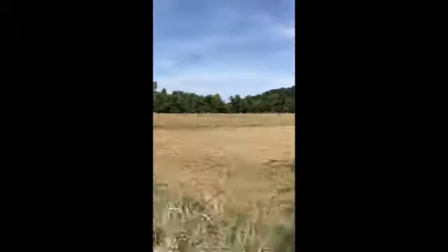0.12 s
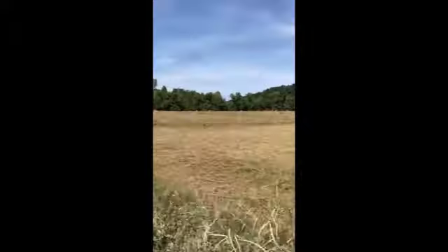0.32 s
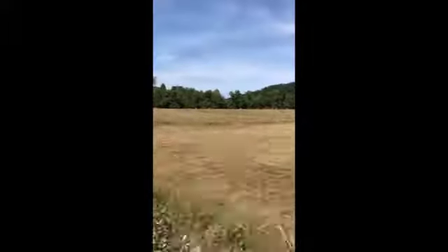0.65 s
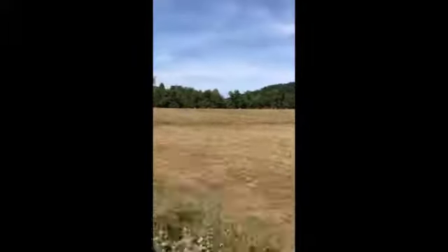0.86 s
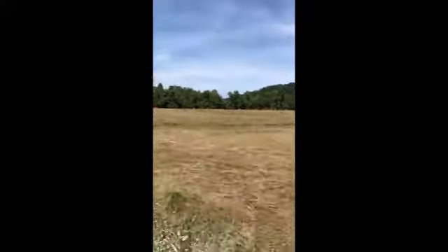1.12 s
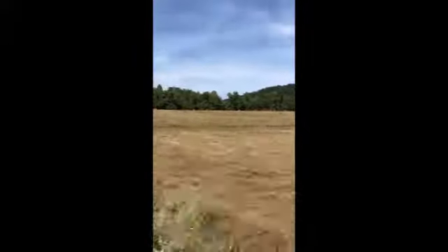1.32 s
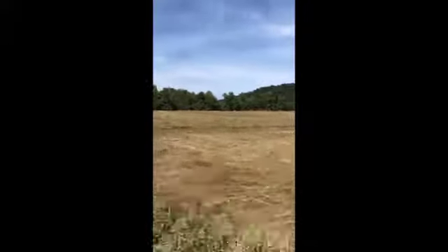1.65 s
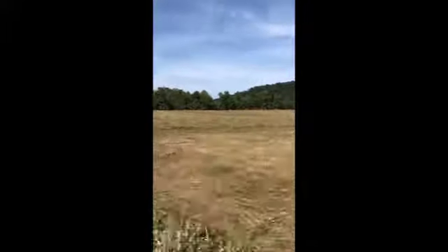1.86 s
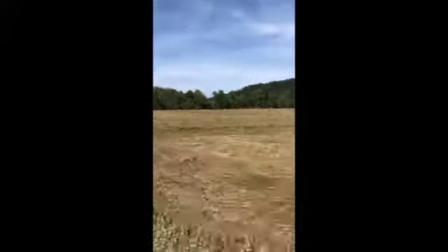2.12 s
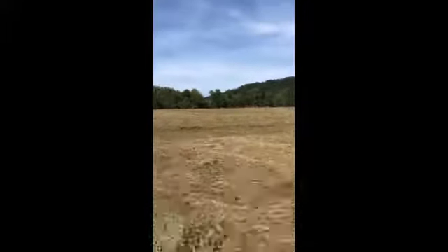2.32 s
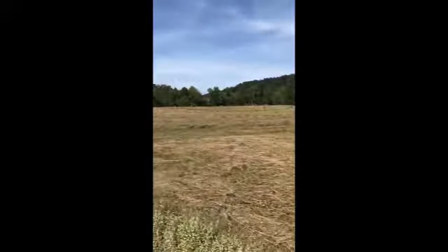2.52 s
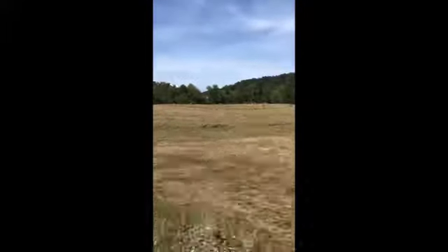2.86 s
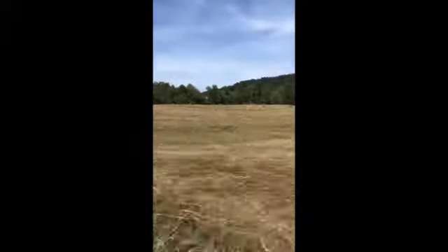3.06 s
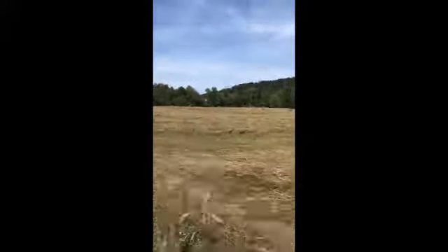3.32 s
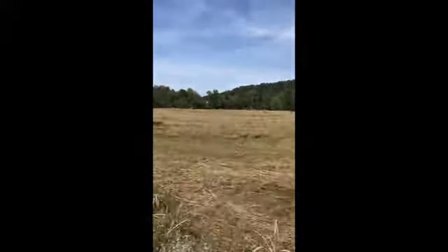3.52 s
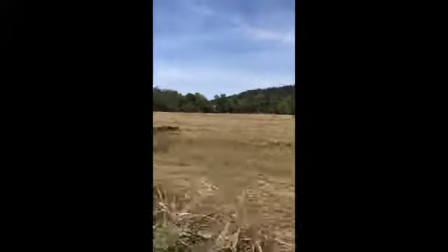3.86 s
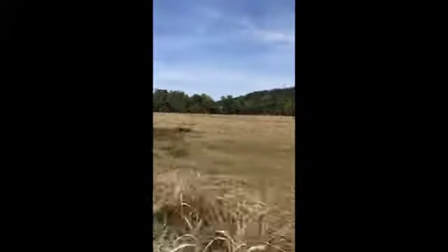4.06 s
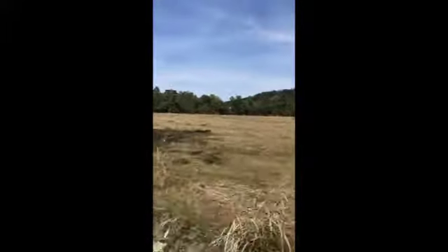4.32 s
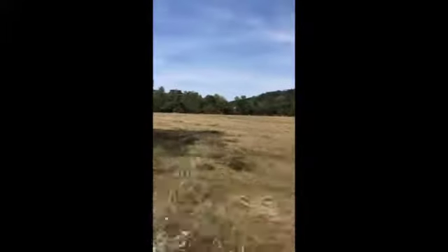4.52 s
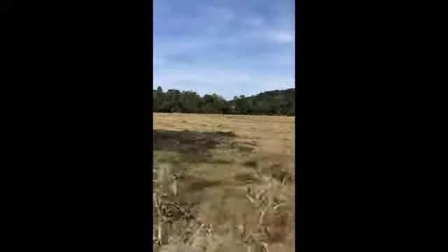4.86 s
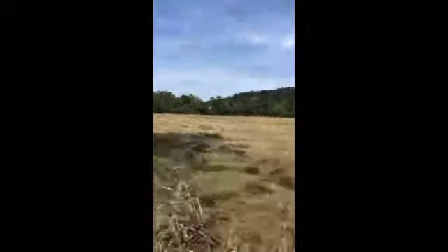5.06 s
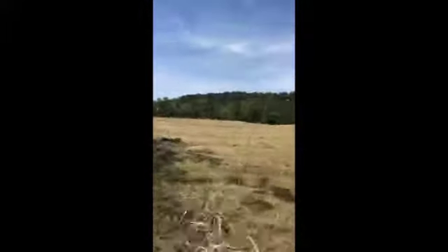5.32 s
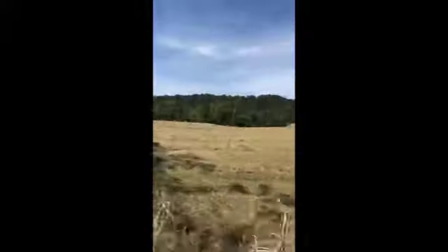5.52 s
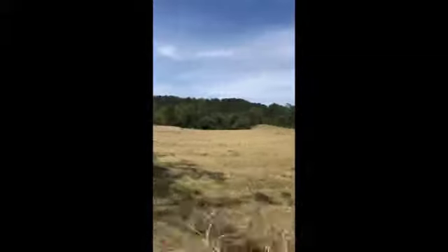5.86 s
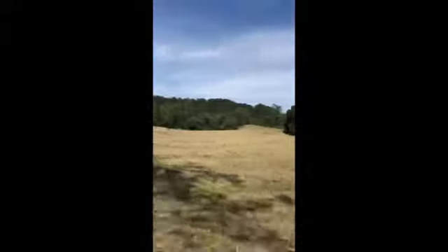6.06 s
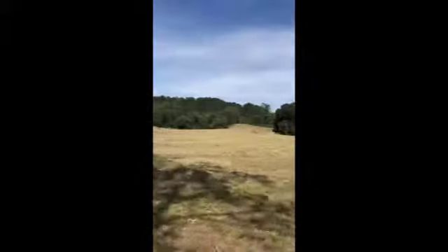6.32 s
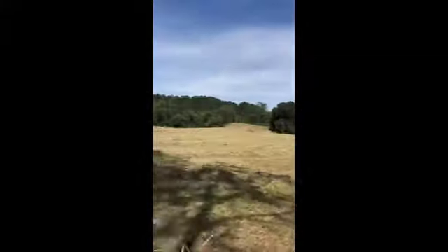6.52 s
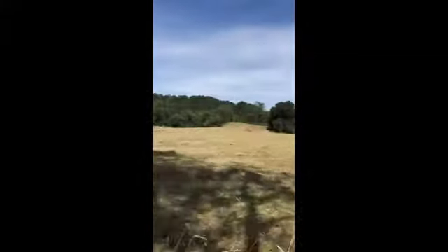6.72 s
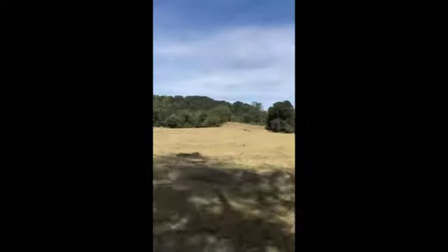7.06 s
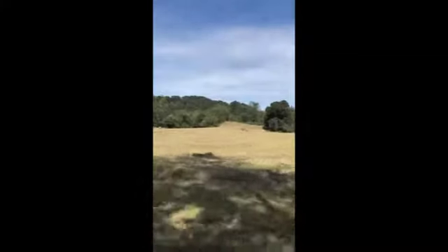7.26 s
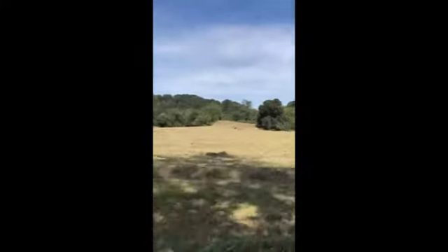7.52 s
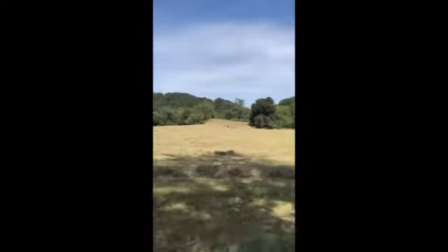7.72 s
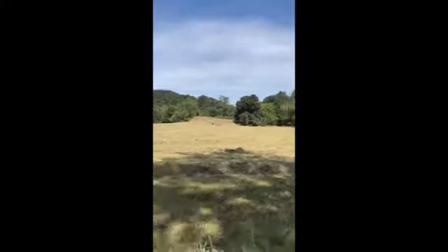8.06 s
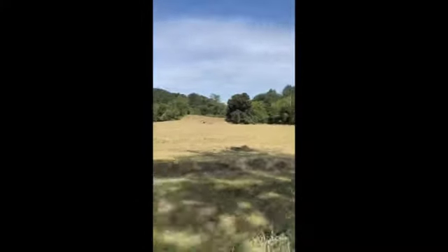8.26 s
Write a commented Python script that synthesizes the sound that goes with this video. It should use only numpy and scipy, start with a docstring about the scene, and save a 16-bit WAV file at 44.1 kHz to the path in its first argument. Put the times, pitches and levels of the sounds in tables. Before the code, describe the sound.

Outdoors in an open field, a microphone on a moving cart takes steady uneven rolling noise, knocks and loose body chatter. Dry stalks tick and snap, mostly in the first half. Short wind puffs hit separately with brief lulls, thicken past five seconds, and become dense mid-low roaring and flapping that nearly buries the cart until the end. Faint shrill insects sit on top.

```python
"""Tyre rumble and thumps of wind open the ride of a golf cart over a dry, bumpy field, heard from the seat.
Shaped noise and grains make the rumble, sine partials the drive hum, decaying panel modes the body rattle.
Stalks crackle and snap as filtered grains and bursts; insects buzz high in the grass as narrow noise.
Eddies of wind hit the microphone as short pressure swings, then crowd into a howling gust
that drives the limiter."""
import sys
import numpy as np
from scipy import signal
from scipy.fft import rfft, irfft, next_fast_len
from scipy.io import wavfile
from scipy.ndimage import uniform_filter1d, minimum_filter1d, map_coordinates

SR = 44100
rng = np.random.default_rng(int(sys.argv[2]) if len(sys.argv) > 2 else 0)


def to_wav(s):
    """Save 16-bit WAV."""
    ch = np.atleast_2d(s).T  # columns
    pcm = np.round(np.clip(ch, -1, 1) * 32767)  # PCM
    wavfile.write(sys.argv[1], SR, pcm.astype(np.int16))


N = 369999  # length in samples


def amp(db):
    """Decibels to gain."""
    return 10 ** (np.asarray(db) / 20)


def unit(x):
    """Scale to rms 1."""
    return x / np.sqrt(np.mean(x ** 2) + 1e-20)


def curves(rows):
    """One value per sample for each column after the time."""
    times, *columns = np.transpose(rows)
    return [np.interp(np.arange(N) / SR, times, column) for column in columns]


def wobble(rate):
    """A smooth random curve, rate knots a second."""
    knots = rng.standard_normal(4096)
    return map_coordinates(knots, [np.arange(N) * rate / SR], mode="wrap")


def filtered(x, response):
    """x times a response of frequency."""
    size = next_fast_len(N + SR // 2)
    spectrum = rfft(x, size) * response(np.fft.rfftfreq(size, 1 / SR))
    return irfft(spectrum, size)[:N]


def coloured(x, points):
    """x filtered by the (Hz, dB) points, joined along log frequency, at rms 1."""
    f, db = np.transpose(points)
    return unit(filtered(x, lambda hz: amp(np.interp(np.log(hz + 1), np.log(f), db))))


def noise(points):
    """Coloured noise of rms 1."""
    return coloured(rng.standard_normal(N), points)


def patchy(x, depth_db):
    """x with its colour shifting in small random patches of pitch and time, at rms 1."""
    bins = signal.stft(x, nperseg=1024)[2]
    field = uniform_filter1d(rng.standard_normal(bins.shape), size=4, axis=0)
    field = uniform_filter1d(field, size=6, axis=1)
    return unit(signal.istft(bins * amp(depth_db * unit(field)), nperseg=1024)[1][:N])


def narrow(hz, width_hz):
    """A narrow band of noise of rms 1 whose centre follows hz."""
    def slow_noise():
        return filtered(rng.standard_normal(N), lambda f: (1 + (f / width_hz) ** 2) ** -.9)
    phase = 2 * np.pi * np.cumsum(hz) / SR
    return unit(slow_noise() * np.cos(phase) + slow_noise() * np.sin(phase))


def grains(rate, spread_db, life):
    """Tiny noise bursts of uneven size at random moments, rate a second, dying with time constant life."""
    sizes = amp(spread_db * np.clip(rng.standard_normal(N), -2, 2))
    kicks = (rng.random(N) < rate / SR) * sizes
    envelope = signal.lfilter([1], [1, -np.exp(-1 / (life * SR))], kicks)
    return envelope * rng.standard_normal(N)


def add(track, s, sound):
    """Mix a sound into the track at s seconds."""
    part = track[max(round(s * SR), 0):][:len(sound)]
    part += sound[:len(part)]


def low_cut(x, hz):
    """Shed the bass below hz."""
    return signal.sosfilt(signal.butter(2, hz, "highpass", fs=SR, output="sos"), x)


# The ride over the ground. Each row: time in seconds, rolling noise in dB.
ROLL_LEVEL = [(0, -23.5), (1.5, -27), (1.9, -24.5), (2.9, -27), (3.12, -28), (3.4, -26.5), (3.8, -25.5),
              (3.97, -28), (4.15, -27), (4.7, -24.5), (5.9, -24.5), (6.6, -29), (8.39, -26.5)]
# Colour of the rolling noise. Each row: frequency in Hz, level in dB per Hz.
ROLL_SPECTRUM = [(20, -5), (35, -2), (52, -27), (75, -9), (105, 1), (180, 6), (290, -3.5), (480, -1.5),
                 (720, -3.5), (950, -9.5), (1130, -7), (1450, -13.5), (2400, -21), (3300, -29),
                 (6000, -37.5), (10000, -41), (16000, -79)]
# The drive at a nearly steady speed. Each row: time in seconds, hum pitch in Hz, level in dB.
DRIVE_CURVE = [(0, 109, -51), (1.1, 106.5, -35), (2.2, 108.2, -33), (3, 111.2, -35.5), (4, 109.1, -35),
               (6, 109.9, -47), (8.39, 108.3, -30.5)]
# Partials of the hum. Each row: multiple of the hum pitch, level relative to the hum level in dB.
HUM_PARTIALS = [(0.8, -5.5), (1, 2.5), (1.601, -31), (1.747, -4.5)]


def cart(boom_hz=230, boom_db=-3.0, lurch_db=3.5):
    """Tyres rumble and the body chatters with the roughness of the ground, over the hum of the drive."""
    roll_db, = curves(ROLL_LEVEL)
    rumble = amp(roll_db + 0.85 * wobble(16)) * patchy(noise(ROLL_SPECTRUM), depth_db=2.5)
    # the deep part comes and goes as the wheels drop into ruts
    boom = filtered(rumble, lambda hz: 1 / (1 + (hz / boom_hz) ** 6))
    rumble = rumble - boom + amp(boom_db + lurch_db * wobble(22)) * boom
    knocks = grains(rate=190, spread_db=5.5, life=0.011)
    chatter = amp(roll_db - 1.0) * coloured(knocks, ROLL_SPECTRUM)
    hz, hum_db = curves(DRIVE_CURVE)
    turns = np.cumsum(hz * (1 + 0.0099 * wobble(8))) / SR
    hum = np.zeros(N)
    for multiple, db in HUM_PARTIALS:
        hum += amp(db + 1.0 * wobble(7.0)) * np.sin(2 * np.pi * multiple * turns)
    return rumble + chatter + amp(hum_db) * hum


def eddy(hz, phase, rise=0.89, glide=1.42, settle=0.5):
    """An eddy hits the port: a few pressure swings, quick at first, then slower."""
    u = np.arange(int(8 * SR / hz)) * hz / SR  # time in periods of hz
    turns = settle * u + glide * (1 - np.exp(-u / 1.103))
    swell = (u / rise * np.exp(1 - u / rise)) ** 1.76
    return swell * np.sin(2 * np.pi * (turns + phase))


# Moments when the stream of air falls away. Each row: middle in seconds, length in seconds, depth in dB.
LULL_DIPS = [(1.474, 0.14, 30), (1.826, 0.061, 8), (2.184, 0.18, 9), (2.836, 0.13, 1), (3.112, 0.07, 21),
             (3.246, 0.04, 16), (3.97, 0.18, 28), (4.21, 0.048, 1), (4.33, 0.039, 20), (4.43, 0.046, 9),
             (4.84, 0.059, 20), (5.21, .05, 17), (5.632, 0.062, 15), (5.728, 0.084, 18), (5.871, 0.025, 7),
             (6.014, 0.032, 24), (6.117, 0.02, 8), (6.408, 0.026, 4), (6.497, 0.018, 20), (6.654, 0.023, 7),
             (6.837, 0.042, 16), (6.898, 0.021, 7), (7.015, 0.025, 10), (7.196, 0.08, 5),
             (7.249, 0.022, 12), (7.285, 0.027, 5), (7.365, 0.039, 8), (7.564, 0.046, 11),
             (7.71, 0.034, 12), (7.791, 0.092, 24), (7.89, 0.029, 17), (7.979, .025, 6.5),
             (8.023, 0.037, 16), (8.123, 0.044, 14), (8.25, 0.064, 26)]


def lulls():
    """The dip in dB of the airstream: each lull closes and opens smoothly."""
    dip = np.zeros(N)
    for s, length, depth_db in LULL_DIPS:
        add(dip, s - length / 2, depth_db * np.hanning(int(length * SR)))
    return dip


# Resonances of the microphone's housing. Each row: frequency in Hz, width in Hz, gain at the centre in dB.
HOUSING_MODES = [(198, 110, 0), (347, 120, -1.5), (508, 180, 1.5), (1010, 80, 0), (1200, 130, 2)]


def housed(x):
    """x through the housing, whose short resonances colour the wind and ring briefly after a thump."""
    for hz, width_hz, db in HOUSING_MODES:
        x = x + (amp(db) - 1) * signal.lfilter(*signal.iirpeak(hz, hz / width_hz, fs=SR), x)
    return x


# Strength of the air on the microphone, a breeze then a gust. Each row: time in seconds, strength in dB.
WIND_STRENGTH = [(0, -25.5), (.7, -23.5), (1.5, -19.5), (2.3, -24), (2.9, -22.5), (3.75, -21.5),
                 (4.35, -25.5), (5.25, -23), (5.5, -18), (5.95, -16), (6.1, -11), (6.65, -8.5), (7.05, -11),
                 (7.5, -9), (7.7, -12), (7.9, -10.5), (8.39, -16)]
# Low buffeting in the stream. Each row: time in seconds, share in dB.
BUFFET_LEVEL = [(0, -16), (1.2, -16.5), (2.5, -26), (4.1, 3), (5, -16), (6.5, -16), (7.3, -7), (8.39, -0.5)]
# The strongest eddies. Each row: time in seconds, strength in dB, pitch in Hz,
# puff relative to that strength in dB.
STRONG_EDDIES = [(0.026, -10, 300, -21), (0.046, -2.5, 238, -21), (0.211, -13.5, 215, -9),
                 (0.288, -15, 222, -29), (0.349, -10, 213, -12), (0.374, -6.5, 345, -20),
                 (0.478, -13, 267, -11), (0.622, -9, 423, -23), (0.709, -4, 595, -13),
                 (0.826, -13, 660, -10), (0.842, -9.5, 308, -2), (0.857, -9, 200, -20),
                 (1.005, -14.5, 200, -14), (1.067, -6, 164, -13), (1.136, -10, 228, -20),
                 (1.153, -13, 264, -22), (1.251, -9, 230, -18), (1.316, -5.5, 440, -15),
                 (1.383, -5.5, 398, -15), (1.4, -9, 278, -24), (1.415, -12, 350, -23),
                 (1.431, 1.5, 206, -22), (1.533, -7, 453, -19), (1.572, -12.5, 386, -3),
                 (1.632, -5, 228, -12.5), (1.659, -13, 248, -2), (1.735, -5.5, 246, -22),
                 (1.855, -12.5, 378, -0.5), (1.925, 1.5, 365, -22), (1.983, -9, 340, -6),
                 (2.03, -2, 373, -18), (2.114, 0.5, 469, -15), (2.204, -7.5, 540, -9.5),
                 (2.4, -8, 218, -23), (2.428, -5, 353, -16), (2.499, -7, 250, -24), (2.527, -3.5, 460, -20),
                 (2.6, 0, 362, -12), (2.659, -1, 408, -15), (2.673, -6.5, 232, -24),
                 (2.707, -6.5, 430, -22), (2.72, -4, 490, -12), (2.758, -15, 300, -7),
                 (2.971, 0, 353, -15.5), (3.044, -5.5, 337, -32), (3.081, -11, 323, -9),
                 (3.216, -12.5, 318, -22), (3.256, -12, 238, -20), (3.312, -3, 317, -13),
                 (3.392, -10.5, 256, -15), (3.443, -15, 496, 0.5), (3.477, -14, 278, -24),
                 (3.641, -1.5, 390, -19), (3.657, -10.5, 220, -20), (3.741, -8.5, 405, -18),
                 (3.785, -12, 304, -10), (3.843, -4, 220, -8), (3.873, -3, 410, -14),
                 (4.097, -12.5, 323, -3.5), (4.143, -9.5, 160, -10), (4.249, 2, 526, -18),
                 (4.263, -12, 169, -22), (4.291, -5, 249, -20), (4.342, 6, 352, -18),
                 (4.399, -6.5, 366, -24), (4.465, -6, 415, -9), (4.48, -11, 463, -13),
                 (4.509, -7.5, 273, -22), (4.571, -8.5, 384, -23), (4.625, -12, 212, -25),
                 (4.68, -2, 406, -13), (4.694, 4.5, 380, -13), (4.75, -5, 288, -6), (4.799, 1, 473, -31),
                 (4.864, -13, 400, -16), (4.909, -5.5, 264, -18), (4.968, -3, 467, -5),
                 (5.049, -15, 604, -2), (5.1, 0.5, 448, -11.5), (5.182, -9.5, 358, -15),
                 (5.344, -19, 290, -20), (5.444, -9.5, 336, -20), (5.464, -6.5, 414, -15),
                 (5.512, -3.5, 480, -5.5), (5.552, -3.5, 380, -29), (5.652, -7.5, 380, -26),
                 (5.666, 1, 480, -27), (5.844, -4, 320, -25), (5.889, -0.5, 440, -3.5),
                 (5.905, -6, 520, -15), (5.913, -5.5, 279, -29), (5.989, -6, 440, -22),
                 (6.038, 0.5, 513, -9), (6.065, 2, 553, -10), (6.135, -1, 525, -11), (6.166, 0, 540, -9),
                 (6.188, 2, 560, -9), (6.214, -8, 620, -6), (6.235, 6, 530, -9), (6.264, 4, 553, -16),
                 (6.326, 0, 464, -20), (6.368, -1, 374, -22), (6.41, -1, 417, -19), (6.439, 4, 700, -7),
                 (6.468, 0, 483, -17), (6.531, -4, 480, -0.5), (6.565, -3, 530, -17), (6.593, 7, 510, -19),
                 (6.627, 0, 480, -28), (6.664, 8.5, 530, -17.5), (6.695, 1, 450, -17),
                 (6.719, -4, 453, -12), (6.737, 5, 570, -17), (6.766, 0.5, 485, -20), (6.797, -2, 780, -11),
                 (6.822, 2, 573, -23), (6.87, -2, 470, -13), (6.918, 3, 470, -9), (7.025, -8, 420, -16),
                 (7.078, 6, 480, -12), (7.094, -4, 625, -4), (7.127, -8, 365, -6), (7.206, 2, 500, -15),
                 (7.232, 1, 440, -15), (7.265, -2, 338, -13), (7.299, 1, 380, -15), (7.335, 0, 273, -17),
                 (7.374, -3, 460, -22), (7.393, -0.5, 258, -14), (7.455, -3, 522.2, -13),
                 (7.493, 0, 425, -21), (7.518, 5, 505, -23), (7.54, 3, 620, -26), (7.575, -17, 417.6, -19),
                 (7.613, 0, 414, -8), (7.639, 1, 460, -16), (7.648, -4.5, 232, -19),
                 (7.689, -4.5, 509, -26), (7.727, -2.5, 465, -10), (7.821, 9, 390, -11.5),
                 (7.873, 2, 360, -13), (7.899, 2, 518, -11), (7.916, -6, 480, -6), (7.947, -9, 300, -11),
                 (7.966, -9, 520, -9), (7.995, -1, 464, -9.5), (8.047, 4, 462, -10.5),
                 (8.068, -4, 794, -13), (8.092, -2.5, 672, -15), (8.133, -8, 480, -16),
                 (8.138, -1, 760, -21), (8.16, -14, 480, -20), (8.202, -2, 317, -9), (8.214, 4, 790, -20),
                 (8.282, -8.5, 380, -22), (8.32, 1, 760, -11), (8.327, -4, 259, -16)]
# Colour of the turbulence. Each row: frequency in Hz, level in dB per Hz.
TURBULENCE_SPECTRUM = [(30, -42), (70, -45), (130, -3.5), (250, 1), (520, 4), (800, -8), (1200, -22),
                       (2000, -31.5), (4000, -80), (10000, -69)]
# Colour of the low buffeting. Each row: frequency in Hz, level in dB per Hz.
BUFFET_SPECTRUM = [(70, -40), (135, -5), (200, -7.5), (400, -15.5), (1500, -80)]
# Colour of an eddy's puff. Each row: frequency in Hz, level in dB per Hz.
PUFF_SPECTRUM = [(150, -20), (350, 6.5), (600, 3), (950, -2), (1250, -9.5), (1600, -14.5), (2200, -27.5),
                 (4000, -37), (10000, -48)]
# faster air sheds more and quicker eddies: their pitch and rate in a breeze of BREEZE_DB,
# and the rise in strength that doubles each
BREEZE_DB, EDDY_HZ, EDDIES_PER_S = -23, 229, 78
PITCH_DOUBLES_DB, RATE_DOUBLES_DB = 13.5, 9.5


def small_eddies(strength_db, crowding):
    """Small eddies are shed at loosely regular intervals, rising in pitch as the air speeds up."""
    typical_hz = EDDY_HZ * 2 ** ((strength_db - BREEZE_DB) / PITCH_DOUBLES_DB)
    flutter = np.zeros(N)
    shed = np.flatnonzero(np.diff(np.floor(np.cumsum(crowding) / SR)))
    for i, (lag, phase, size, pitch) in zip(shed, rng.uniform(-1, 1, (4000, 4))):
        # crowded eddies are more alike in pitch
        scatter = 0.6 * (EDDIES_PER_S / crowding[i]) ** 0.24
        swing = eddy(typical_hz[i] * np.exp(scatter * pitch), phase)
        add(flutter, i / SR + 0.793 * lag / crowding[i], amp(8.1 * size) * swing)
    # about the same power however many eddies share it
    return flutter * np.sqrt(typical_hz / crowding)


def strong_eddies(wake_db=-12.5, puff_t60=0.065, edge_db=-16, edge_db_per_octave=7, edge_ratio=1.68):
    """A strong eddy thumps with a sharp edge, breaks on the port in a bright puff and trails a slower wake."""
    thumps, puffs, t = np.zeros(N), np.zeros(N), np.arange(SR // 16) / SR
    variations = rng.random((len(STRONG_EDDIES), 4))
    for (s, db, hz, puff_db), (phase, lag, turn, life) in zip(STRONG_EDDIES, variations):
        add(thumps, s + 0.002945, amp(db - 1.0) * eddy(hz, phase, rise=0.73 + 0.43 * life))
        # the leading edge is a higher snap: the quicker the eddy, the crisper
        crisp_db = edge_db + edge_db_per_octave * np.log2(hz / 450)
        add(thumps, s + 0.003403, amp(db + crisp_db) * eddy(edge_ratio * hz, turn, rise=0.99))
        puff = amp(db + puff_db - 60 * t / puff_t60) * (1 - np.exp(-t / 0.00056))
        add(puffs, s + 0.00112, puff)
        wake = amp(db + wake_db) * eddy(np.sqrt(hz * 150), turn)
        add(thumps, s + 0.00761 + 0.00588 * lag, wake)
    return thumps, puffs * noise(PUFF_SPECTRUM)


def wind(finest_db=-10, swell_db=3.0, stream_db=-5.0):
    """Small eddies crowd and rise in pitch as the air speeds up; strong ones stand out as thumps."""
    strength_db, = curves(WIND_STRENGTH)
    buffet_db, = curves(BUFFET_LEVEL)
    crowding = EDDIES_PER_S * 2 ** ((strength_db - BREEZE_DB) / RATE_DOUBLES_DB)  # eddies a second
    flutter = small_eddies(strength_db, crowding)
    thumps, puffs = strong_eddies()
    # the stream swells and sags many times a second, most where eddies are few
    unevenness_db = swell_db * np.tanh(wobble(28)) * np.sqrt(EDDIES_PER_S / crowding)
    flow_gain = amp(strength_db - lulls() + unevenness_db + stream_db)
    turbulence = amp(-4.0) * noise(TURBULENCE_SPECTRUM)
    buffeting = amp(buffet_db) * noise(BUFFET_SPECTRUM)
    flow = flow_gain * (flutter + turbulence + buffeting)
    # each eddy breaks up into finer turbulence
    swirl = np.sqrt(np.abs(uniform_filter1d((flow + thumps) ** 2, size=160)))
    finest = amp(finest_db) * swirl * noise(TURBULENCE_SPECTRUM)
    return housed(flow + thumps + finest + puffs)


# Dry grass under the wheels. Each row: time in seconds, crackle in dB, sheen of the finest stalks in dB.
GRASS_LEVELS = [(0, -47, -63), (1.7, -48, -55), (2.9, -48.5, -73), (4.2, -48, -58), (5, -47.5, -53),
                (6.6, -56, -55.5), (7.6, -53, -53), (8.39, -53, -52)]
# Colour of the swish and crackle. Each row: frequency in Hz, level in dB per Hz.
GRASS_SPECTRUM = [(800, -24), (2500, 9), (4500, 4), (6800, 2), (8200, -1), (9600, 1.5), (10600, -19),
                  (15800, -10.5)]
# Colour of the finest stalks. Each row: frequency in Hz, level in dB per Hz.
FINE_SPECTRUM = [(4000, -21), (8000, -3.5), (10500, -6.5), (15800, -9.5)]


def grass(tufts_db=2.0):
    """Dry stalks swish and crackle under the wheels, tuft by tuft; the finest ones add a ticking sheen."""
    grass_db, sheen_db = curves(GRASS_LEVELS)
    tufts = amp(tufts_db * wobble(14))
    swish = patchy(noise(GRASS_SPECTRUM), depth_db=2.5)
    crackle = coloured(grains(rate=260, spread_db=10.5, life=0.0022), GRASS_SPECTRUM)
    ticks = coloured(grains(rate=90, spread_db=4.5, life=0.0059), FINE_SPECTRUM)
    sheen = amp(sheen_db) * (noise(FINE_SPECTRUM) + amp(-1.5) * ticks)
    return tufts * (amp(grass_db - 2.5) * (swish + crackle) + sheen)


# Insects in the grass. Each row: time in seconds, level of the near one in dB, level of a shriller one in dB.
INSECT_LEVELS = [(0, -55, -56), (1, -55.5, -58), (2, -63, -83), (4.6, -57, -77), (5.05, -57, -71),
                 (5.55, -52.5, -55), (5.9, -50.5, -63), (6.1, -48, -66), (6.42, -46, -70), (6.7, -50, -72),
                 (6.85, -49.5, -72), (7.2, -55, -68), (7.47, -51, -68), (7.78, -52, -68), (7.85, -59, -74),
                 (8.39, -59, -70)]
# Colour of the shriller insect. Each row: frequency in Hz, level in dB per Hz.
SHRILL_SPECTRUM = [(7500, -50), (8350, -12), (8550, -4), (8800, -3), (10000, -41)]


def insects(stroke_hz=30.7, crest_hz=8110, sweep_hz=600, width_hz=110, depth_db=7, waver_db=1.0):
    """A high rasp rises and falls in pitch and level with every wing stroke; a second insect sings higher."""
    near_db, shrill_db = curves(INSECT_LEVELS)
    strokes = np.cumsum(stroke_hz * (1 + 0.04 * wobble(6.8))) / SR
    # 0 in mid-stroke, 1 where the wing turns round
    slack = 1 - np.abs(np.sin(np.pi * strokes))
    rasp = narrow(crest_hz - sweep_hz * slack + 60 * wobble(120), width_hz)
    near = unit(amp(waver_db * wobble(18) - depth_db * slack) * rasp)
    return amp(near_db) * near + amp(shrill_db) * noise(SHRILL_SPECTRUM)


# Stalks and loose fittings clicking. Each row: start in seconds, clack in dB, snap in dB.
CLICK_HITS = [(0.1715, -30, -33), (0.27, -39, -43), (0.358, -28, -39), (0.4404, -30, -38),
              (0.6065, -34, -25), (0.85, -28.5, -36), (1.1214, -32, -36), (1.217, -30, -29.5),
              (1.147, -35, -42), (1.372, -30, -39), (1.422, -34, -46), (1.6196, -26.5, -41),
              (1.8594, -27, -35), (2.014, -24, -43), (2.2222, -35, -37), (2.3004, -34, -37),
              (2.614, -29, -35), (2.6614, -29, -40), (2.9731, -30, -41), (3.339, -30, -31.5),
              (3.381, -27.5, -33), (3.459, -31, -35), (4.582, -27, -36), (4.692, -30, -34),
              (4.7406, -32, -33), (4.816, -34, -36), (5.094, -26, -36), (6.432, -37, -35),
              (7.6035, -36, -38), (7.9217, -40, -36), (7.986, -34, -33)]
# Colour of the mid clack. Each row: frequency in Hz, level in dB per Hz.
CLACK_SPECTRUM = [(400, -25), (1100, -2), (2500, 5), (5500, -2.5), (8000, -15), (16000, -37)]
# Colour of the bright snap. Each row: frequency in Hz, level in dB per Hz.
SNAP_SPECTRUM = [(3000, -24), (6000, 6.5), (8000, 10), (9500, 6), (11000, -8), (16000, -3)]


def clicks(rise=0.0014, t60=0.041):
    """Stiff stalks whip the body and loose fittings knock: a mid clack with a bright snap, both noise bursts."""
    clack, snap, t = np.zeros(N), np.zeros(N), np.arange(SR // 8) / SR
    fall = amp(-60 * t / t60) * (1 - np.exp(-t / rise))
    for s, clack_db, snap_db in CLICK_HITS:
        add(clack, s, amp(clack_db) * fall)
        add(snap, s, amp(snap_db) * fall)
    return clack * noise(CLACK_SPECTRUM) + snap * noise(SNAP_SPECTRUM)


# Bumps that rattle the body. Each row: start in seconds, level in dB.
BUMPS = [(0.379, -17), (0.711, -21), (0.828, -15.5), (1.368, -20), (1.857, -20), (2.01, -19.5),
         (2.096, -21), (3.384, -23), (4.688, -19), (4.941, -23), (5.101, -23), (5.889, -21), (6.44, -16.5),
         (7.206, -21.5), (8.321, -18)]
# What the loose panels ring with. Each row: frequency in Hz, level in dB, time to fall 60 dB in seconds.
PANEL_MODES = [(482, -2, 0.055), (687, -3, 0.085), (1130, -3, .045), (1295, -2.5, .035),
               (1656, -5.5, 0.027), (2043, -8.5, 0.021), (2550, -14, 0.027), (3490, -18.5, 0.021),
               (4920, -21, 0.015)]
# a bouncing panel: typical seconds between contacts, loss at each one
BOUNCE_S, BOUNCE_LOSS_DB = .013, 5.5


def rattles(detune=0.031, crack_db=-6, crack_t60=.012):
    """Each bump throws a loose panel against the frame; it bounces, ringing differently at every contact."""
    track, t = np.zeros(N), np.arange(SR // 12) / SR
    hz, mode_db, t60 = np.transpose(PANEL_MODES)[:, :, None]
    for s, db in BUMPS:
        for k in range(4):
            pitch, size, phase = rng.uniform(-1.02, 1, (3, len(PANEL_MODES), 1))
            tones = np.sin(2 * np.pi * (hz * (1 + detune * pitch) * t + phase))
            ring = (amp(mode_db + 3.1 * size - 60 * t / t60) * tones).sum(axis=0)
            dull_noise = signal.lfilter([.3], [1, -.7], rng.standard_normal(len(t)))
            crack = amp(crack_db - 60 * t / crack_t60) * dull_noise
            knock = (ring + crack) * (1 - np.exp(-t / 0.00037))
            contact = s + BOUNCE_S * k * rng.uniform(.8, 1.2)
            add(track, contact, amp(db - BOUNCE_LOSS_DB * k) * knock)
    return track


# The gust howling across the port. Each row: time in seconds, centre in Hz, level in dB.
HOWL_CURVE = [(5.85, 488.4, -47), (6.1, 547.4, -26), (6.6, 558, -17), (6.95, 524, -20), (7.15, 475, -35),
              (7.55, 522, -17), (7.8, 485.6, -48), (8.39, 468.4, -44)]


def howl(width_hz=135, flutter_db=6.0):
    """The gust excites a broad resonance: a noise band that glides, flutters and drops with each lull."""
    hz, level_db = curves(HOWL_CURVE)
    tone = narrow(hz * (1 + 0.063 * wobble(12)), width_hz)
    return amp(level_db - lulls() + flutter_db * wobble(45)) * unit(low_cut(tone, 370))


def scene():
    """Everything at one microphone."""
    return (cart() + wind() + grass() + insects() + clicks() + rattles() + howl())[None]


TOP_HZ = 15830  # upper end of the recorded band


def record(dry, port_hz=56, output_hz=52):
    """The microphone sheds deep bass, a fast limiter holds the peaks, and the band ends steeply."""
    ceiling, recovery_s = .86, .03
    x = low_cut(dry[0], port_hz)
    needed = np.minimum(1, ceiling / (np.abs(x) + 1e-9))
    fast = uniform_filter1d(minimum_filter1d(needed, size=120), size=120)
    # the gain comes back a little after each peak
    keep = np.exp(-1 / (recovery_s * SR))
    slow = 1 - signal.lfilter([1 - keep], [1, -keep], 1 - fast)
    limited = x * np.minimum(fast, slow)
    trimmed = low_cut(low_cut(limited, output_hz), output_hz)
    return filtered(trimmed, lambda hz: hz < TOP_HZ)[None]


dry = scene()
out = record(dry)
to_wav(out)
```